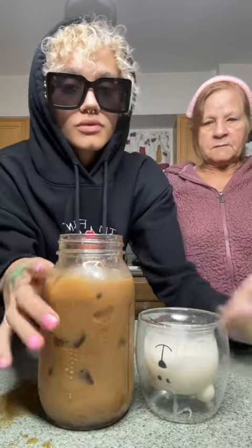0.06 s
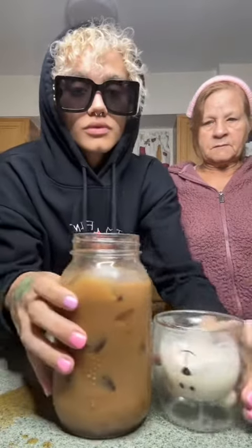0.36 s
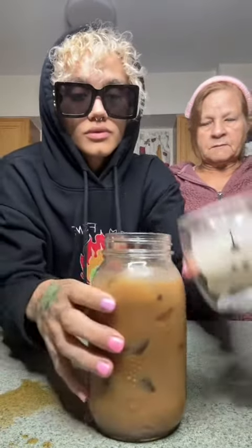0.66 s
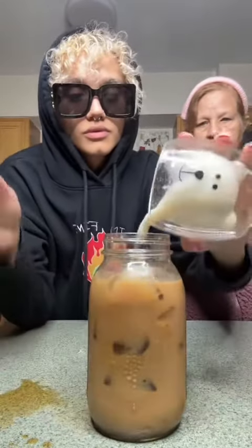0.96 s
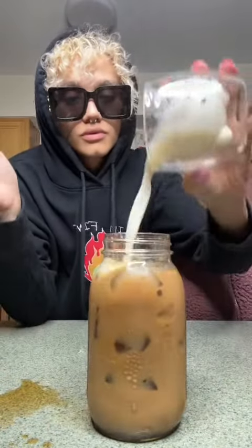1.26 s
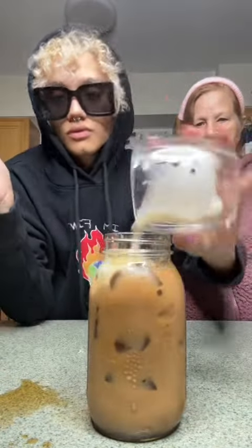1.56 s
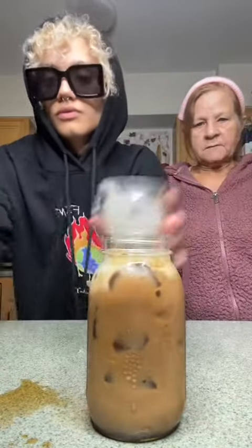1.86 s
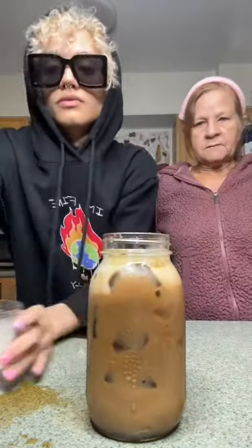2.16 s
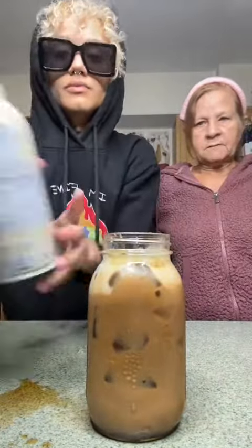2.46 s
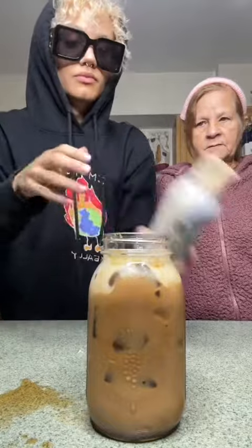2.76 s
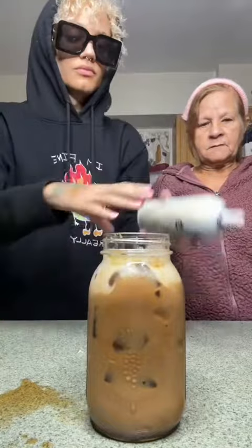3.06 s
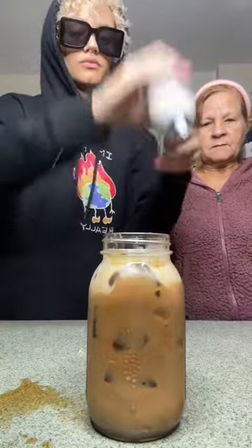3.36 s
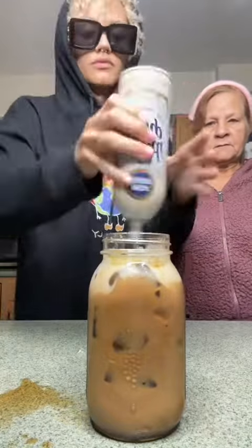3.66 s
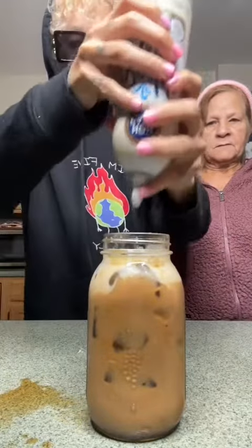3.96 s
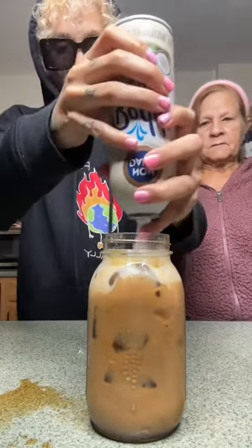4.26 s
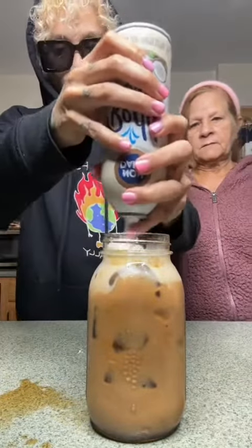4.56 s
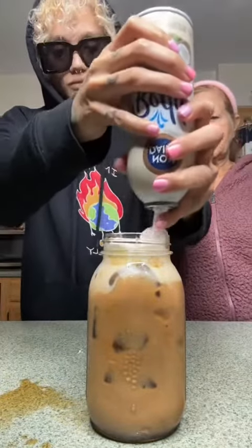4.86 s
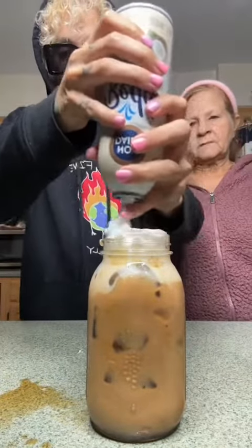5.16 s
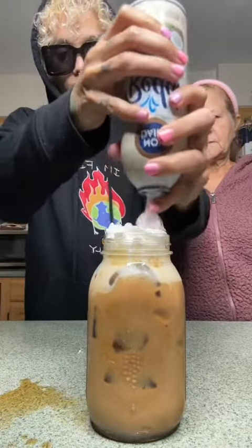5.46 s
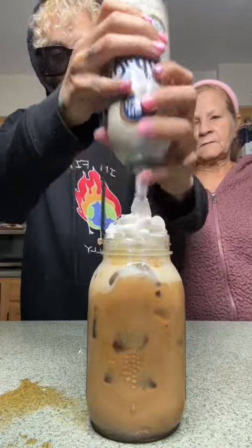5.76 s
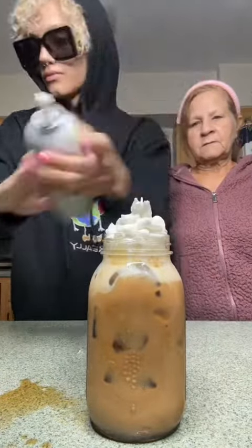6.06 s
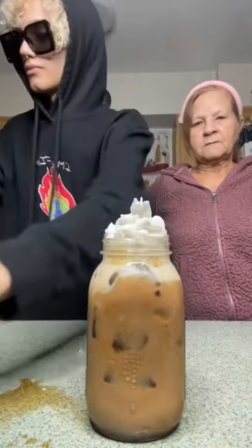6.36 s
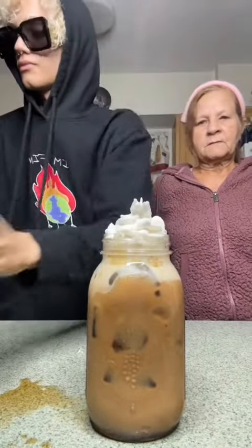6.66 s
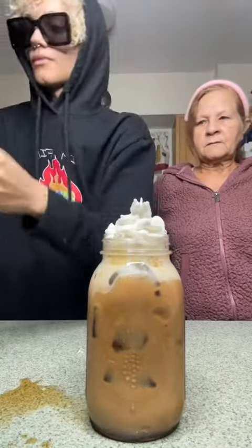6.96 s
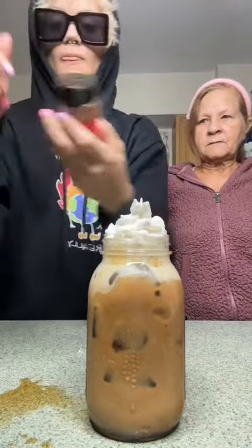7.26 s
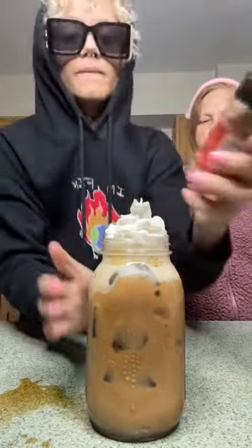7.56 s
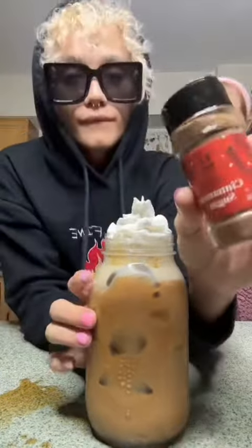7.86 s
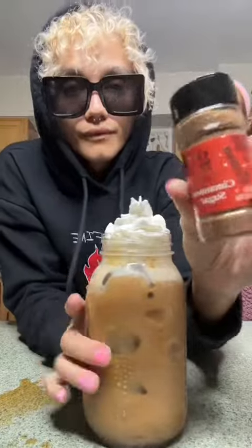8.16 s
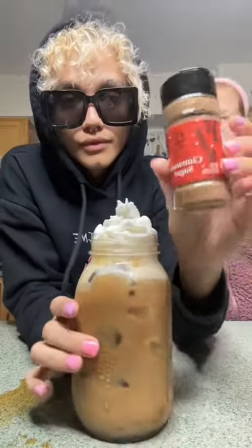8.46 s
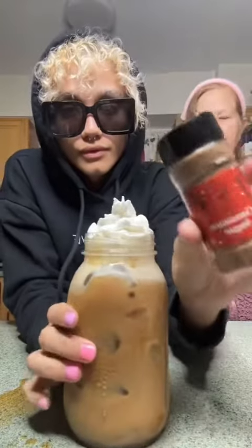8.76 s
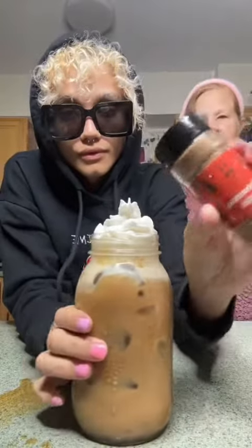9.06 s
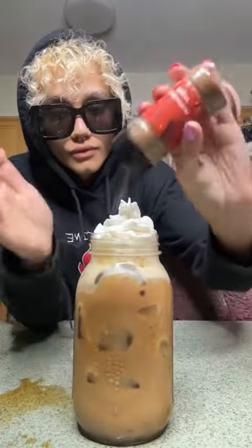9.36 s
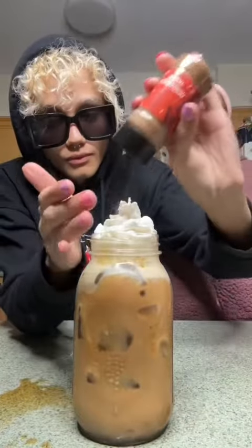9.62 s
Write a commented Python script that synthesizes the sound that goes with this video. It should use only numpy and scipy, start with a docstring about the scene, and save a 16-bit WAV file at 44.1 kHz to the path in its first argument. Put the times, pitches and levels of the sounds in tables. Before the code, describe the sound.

At the start a glass jar knocks and slides on a kitchen counter, and ice clinks inside it until about 1.3 seconds. The jar is set down sharply at 1.5 seconds, and a glass cup knocks twice around 2. A metal can lands loudly at 2.8 seconds and rocks briefly, followed by light fingernail ticks. At 4 seconds the can spits gas, and whipped cream sprays in a growing, sputtering, bubbly hiss that stops at about 5.7. A loud hollow knock on a board comes at 6.3 seconds, then a short jerky scrape. From 7.5 to 9 seconds sleeves rustle and rub, with taps and dull thumps of forearms on the counter, heaviest near 7.8. From 9.3 seconds sugar slides softly in a plastic shaker several times. Everything sounds close, in a small hard room with faint, low ventilation noise.

```python
"""Whipped cream sputters from a can onto iced coffee: gas hisses through slots, bubbles ring the nozzle.
Before it, a glass jar slides on a kitchen counter, ice clinks, a cup knocks, the can lands and rocks.
After it, a hollow board is struck, an object drags in stick-slip jerks, forearms thump down
and sugar slides in a shaker. Knocks travel through the slab as bending waves.
Small hard room, low ventilation noise."""
import sys
import numpy as np
from scipy import signal
from scipy.fft import rfft, irfft
from scipy.io import wavfile

SR = 44100
rng = np.random.default_rng(int(sys.argv[2]) if len(sys.argv) > 2 else 0)


def persist_wave(psi):
    """Save psi, clipped to +-1, as 16-bit WAV."""
    counts = np.round(np.clip(psi, -1, 1) * 32767).astype(np.int16)
    wavfile.write(sys.argv[1], SR, np.atleast_2d(counts).T)


N = 436149
TIME_S = np.arange(N) / SR
HIT_S = TIME_S[:32768]

# Resonances of gas slots, nozzle tube, foam, spits: centre_hz, width_hz, gain_db
SLOT_PEAKS = [(2486, 1080, -2), (3040, 920, -0.5), (3400, 490, -7), (4640, 920, -1.5), (5525, 1440, 2.5),
              (6024, 810, 2), (6960, 1330, 1), (8050, 3540, -2.5), (14440, 3000, -6)]
NOZZLE_PEAKS = [(1487, 310, 14.5), (1800, 530, 2.5)]
FOAM_PEAKS = [(844, 630, 37.5), (470, 180, -26.5), (944, 97, -38)]
SPIT_PEAKS = [(5120, 640, 2.8), (7150, 280, 4.0), (8330, 280, 0.5)]
# Cream clots changing the nozzle level: start_s, gain_db
CREAM_CLOTS = [(4.33, -3), (4.452, 0.5), (5.475, 7)]
# First spits of gas: start_s, level_db
GAS_SPITS = [(4.031, -49.5), (4.067, -18)]
# Hard set-downs: start_s, bass_db, middle_db, treble_db, ring_db, lowest_hz, middle_hz, treble_hz
HARD_KNOCKS = [(0.002, -11.5, -17.5, -16, -6.5, 130, 1900, 4600),
               (1.536, -14.5, -26, -13.5, -4.5, 45, 970, 10800),
               (1.8006, -19, -15.5, -20.5, -6.5, 100, 1290, 3100),
               (2.0273, -20.5, -13, -28, -6.5, 80, 1050, 5600),
               (2.8409, -23, -16, -18.5, 1.5, 186, 1850, 6120),
               (6.3096, -23.5, -29, -23, -5, 210, 1390, 6840),
               (6.3321, -27, -13, -23, -26.5, 200, 1210, 4570)]
# Dull bumps on the counter: start_s, bass_db, lowest_hz, middle_re_bass_db, ring_db
SOFT_BUMPS = [(0.048, -23, 300, -4.5, -22), (0.066, -25, 300, -19, -13), (0.094, -21.5, 283, -26, -28),
              (2.0611, -18, 324, -2, -8), (2.167, -31, 325, -8, -9), (6.3924, -33, 300, 5.5, -27),
              (7.75, -24, 70, -13, -30), (7.912, -29.5, 139, -7, -20), (7.926, -25.5, 70, -21, -30),
              (8.2336, -24, 70.6, -14.5, -15)]
# Heavy landings: start_s, peak_db, pitch_hz, t60_s
LANDINGS = [(1.548, -20, 268, .12), (2.856, -29, 80, .15), (6.342, -20.5, 48.3, 0.049),
            (7.76, -36, 105, .09), (7.831, -8.5, 64, 0.16), (7.931, -19.5, 64, 0.089),
            (8.15, -30, 105, 0.081), (8.242, -27.5, 84, 0.23)]
# Modes of glass jar, glass cup, metal can, hollow board: pitch_hz, level_db, t60_s
JAR_MODES = [(1653, -6, .4), (2700, 1, .16), (2885, -1, .35), (2975, -4, .35), (5663, -15, .6),
             (6767, -5, .3), (8250, 2, .22), (9819, -7, .35)]
CUP_MODES = [(991, -3.5, 0.48), (1650, -9, .5), (3760, 1, 0.13), (5610, -17.5, 1), (5720, 1.5, 0.24)]
CAN_MODES = [(293.4, -4, 0.22), (492, -4.5, .2), (1510, -4.5, 0.052), (2150, -7.5, 0.11),
             (2400, -11.5, 0.38), (3080, 3, 0.08)]
BOARD_MODES = [(261.4, -12, 0.18), (484, -2, 0.065), (796, -26.5, 0.42), (1000, -29, 0.45),
               (1360, -29, .42), (1570, -1, 0.03), (1740, -26.5, .4)]
# Strikes on each: start_s, peak_db
JAR_HITS = [(0.003, -18), (1.537, -16.5), (2.175, -33)]
CUP_HITS = [(1.801, -18), (2.028, -28)]
CAN_HITS = [(2.840, -8)]
BOARD_HITS = [(6.3105, -5), (6.393, -38)]
# Ice against the jar: start_s, level_db, pitch_hz
ICE_CLINKS = [(0.2747, -14.5, 1750), (0.2875, -12, 1740), (0.419, -18.5, 1510), (0.4663, -24, 1520),
              (0.5874, -27, 1580), (0.621, -23.5, 1470), (0.6871, -17.5, 1520), (0.7121, -11, 1580),
              (0.7913, -22.5, 1510), (0.889, -36, 1410), (1.104, -19.5, 1540), (1.1422, -25, 1470),
              (1.168, -23, 1600), (1.261, -34.5, 1620)]
# Light ticks of ice, fingernails and caps: start_s, body_db, snap_db, body_hz
LIGHT_TAPS = [(0.093, -37, -15.5, 1090), (0.245, -26, -1.5, 2250), (0.2735, -18, -7, 1590),
              (1.006, -36.5, -30, 2000), (1.069, -29.5, -28, 1570), (1.1032, -24, -26, 3400),
              (1.1607, -25, -35, 2270), (2.4373, -28, -54, 1010), (2.452, -27.5, -25, 1970),
              (2.5121, -37, -30.5, 2410), (3.318, -37.5, -25.5, 1540), (3.3895, -50, -32.5, 1910),
              (3.6582, -37, -31.5, 1930), (3.7496, -41, -33.5, 3320), (3.9084, -39, -44.5, 4220),
              (5.989, -38, -28.5, 4350), (6.033, -44.5, -33, 4000), (6.05, -40.5, -35, 4030),
              (7.126, -59, -29, 4000), (7.5051, -34, -21, 3340), (7.637, -45, -15.5, 1390),
              (8.314, -33, -16, 1390), (8.7952, -25.5, -13.5, 2470), (9.183, -40, -24.5, 3230),
              (9.298, -37.5, -28.5, 3420), (9.357, -46, -18.5, 3000)]
# Dragged object breaking loose: start_s, scrape_db, drone_db
DRAG_JERKS = [(6.591, -40.5, -37), (6.652, -27, -26), (6.701, -27, -22.5), (6.731, -22, -31.5),
              (6.781, -35, -34.5), (6.839, -46, -39), (6.868, -40, -39)]
# Its scrape and hollow-body resonances: centre_hz, width_hz, gain_db
SCRAPE_PEAKS = [(725, 260, -1.5), (1410, 460, -2.5), (2070, 460, 2.5), (3180, 1300, -2), (6440, 2900, -0.5)]
HOLLOW_PEAKS = [(370, 59, 3), (470, 67, -3)]
# Sugar slides: start_s, length_s, level_db
SUGAR_SLIDES = [(9.339, 0.034, -26), (9.386, 0.054, -38.5), (9.455, 0.11, -36), (9.603, 0.08, -34),
                (9.766, 0.15, -34)]
# Sleeves, hands and jar over the counter: start_s, length_s, rub_db, rustle_db, rumble_db
COUNTER_STROKES = [(0.0, 0.45, -37, -40, -43), (0.465, 0.077, -37.5, -39.5, -47),
                   (0.613, 0.16, -64, -58, -44), (0.781, .66, -53.5, -53.5, -53),
                   (1.54, 0.4, -50.5, -55, -46), (2.105, 0.17, -45, -49, -52),
                   (2.43, 0.18, -60, -58, -52.5), (6.99, 0.17, -70, -50.5, -68),
                   (7.353, 0.34, -67, -52, -67), (7.588, 0.089, -40, -41.5, -41),
                   (7.715, 0.22, -40.5, -47, -36.5), (8.07, 0.18, -51, -50.5, -44.5),
                   (8.254, 0.16, -37.5, -46.5, -45), (8.592, 0.16, -35.5, -43.5, -41.5),
                   (8.844, 0.14, -38, -44, -48), (9.04, 0.2, -61, -49, -49.5), (9.28, 0.5, -53.5, -52, -51)]
# Spectra of sugar, rubbing, rustle, ventilation, microphone response: frequency_hz, gain_db
SUGAR_SPECTRUM = [(1500, -14), (4000, -3.5), (6200, 3), (9000, 3), (15000, 3)]
RUB_SPECTRUM = [(40, -27.5), (160, -1.5), (350, 6), (800, -2.5), (1500, -0.5), (2500, -5), (5000, -11),
                (12000, -19.5)]
RUSTLE_SPECTRUM = [(1500, -29), (3500, -7.5), (5500, 4), (7500, 2.5), (15000, -1.5)]
VENT_SPECTRUM = [(25, -8.5), (60, -0.5), (100, -10.5), (140, 4.5), (250, -2.5), (450, -6.5), (800, -15.5),
                 (2000, -21), (6000, -20), (15000, -25)]
MIC_RESPONSE = [(20, -18.5), (50, 4.5), (4800, -1.5), (6100, 0), (6500, 0), (8500, -5.5), (8850, -14.5),
                (11000, -17.5), (12900, -7.5), (13300, -4), (16000, -1)]
# Room decay: frequency_hz, t60_s
ROOM_DECAY = [(100, 0.2), (400, 0.51), (1200, 0.36), (4000, 0.44), (8000, 0.092), (16000, 0.47)]


def cream(open_s=4.069, held_s=1.644, spurt_hz=95, spurt_db=2.5, sag_db_per_s=8, clot_s=.025):
    """Gas and foam leave in uneven spurts; bubbles ring the nozzle and splutter on the drink."""
    valve = swell(open_s, held_s, attack_s=.027, release_s=.0061)
    age_s = np.clip(TIME_S - open_s, 0, held_s)

    def build(full_db, shortfall_db, build_s):
        """Gain rising as the nozzle clears."""
        return valve * undb(full_db - shortfall_db * np.exp(-age_s / build_s))

    clots_db = sum(db * swell(s, clot_s, clot_s / 2, clot_s / 2) for s, db in CREAM_CLOTS)
    tube_gain = build(-20.5, 9.4, .35) * undb(clots_db - sag_db_per_s * age_s)
    filled = np.clip((age_s - .1) / .012, 0, 1)  # cream arrives after the gas
    flow = undb(walk(170))
    spurt_phase = 2 * np.pi * np.cumsum(spurt_hz * (1 + .293 * walk(40))) / SR
    spurts = undb(spurt_db * np.sin(spurt_phase))
    pops = undb(-14) * grains(60, 2)
    gas = grains(11000, 1.9) * flow + pops
    hiss = build(-17.5, 18.7, .31) * slot_hiss(gas, age_s)
    bubbles = grains(3500, 3) * spurts + undb(9) * pops
    tube = tube_gain * unit(band(resonate(bubbles, NOZZLE_PEAKS), 1850, 5000))
    splutter = resonate(grains(2500, 1.4) * flow, FOAM_PEAKS)
    foam = build(-32, 12, .32) * unit(band(splutter, 260, 1200))
    return undb(-7 * (1 - filled)) * (hiss + tube + foam)


def slot_hiss(gas, age_s, wander_db=1.27, tilt_db_per_octave_s=1.6, pivot_hz=7000, even_s=.85):
    """Slots clog and clear independently; low resonances fade as the mound grows."""
    out = 0
    for peak in SLOT_PEAKS:
        tone = resonate(resonate(gas, [peak]), [peak])
        tilt_db = tilt_db_per_octave_s * np.log2(pivot_hz / peak[0]) * (age_s - even_s)
        out = out + tone * undb(wander_db * walk(9) - tilt_db)
    return unit(band(out, 1500, 19000, order=3))


def spits():
    """The opening valve spits gas."""
    gain = sum(undb(db) * swell(s, length_s=.019, attack_s=.013, release_s=.02) for s, db in GAS_SPITS)
    return gain * unit(band(resonate(grains(9000, 1.6), SPIT_PEAKS), 4300, 12000))


def knocks():
    """Hard knocks and dull bumps on the counter."""
    out = np.zeros(N)
    for s, bass_db, middle_db, treble_db, ring_db, *pitches_hz in HARD_KNOCKS:
        add(out, s, blow((bass_db, middle_db, treble_db), ring_db, *pitches_hz))
    for s, db, lowest_hz, tilt_db, ring_db in SOFT_BUMPS:
        levels_db = db, db + tilt_db, db + tilt_db - 15
        add(out, s, blow(levels_db, ring_db, lowest_hz, middle_hz=820, bass_top_hz=lowest_hz + 330))
    return out


def blow(levels_db, ring_db, lowest_hz, middle_hz, treble_hz=5600, bass_top_hz=540,
         echo_s=.0135, echo_db=-9, scatter_db=3, scatter_cycles=7, build_s=.0056):
    """A blow scatters off near slab edges, echoes from the ceiling and leaves a dense ring."""
    push = signal.unit_impulse(len(HIT_S))
    echo = undb(echo_db) * np.roll(push, int(echo_s * SR))
    # low_hz, high_hz, tail_db, t60_s
    bands = [(lowest_hz, bass_top_hz, 4, .19),
             (middle_hz / 1.94, middle_hz * 1.43, 0, .16),
             (treble_hz / 1.88, treble_hz * 1.88, 0, .13)]
    out = 0
    for db, (low_hz, high_hz, tail_db, t60_s) in zip(levels_db, bands):
        contact = push + undb(scatter_db) * burst(scatter_cycles / high_hz + .0061)
        direct = slab(band(contact, low_hz, high_hz))
        direct *= np.sqrt(SR / 100) / np.linalg.norm(direct)  # energy of 10 ms at rms 1
        tail = undb(tail_db) * burst(t60_s) * (1 - np.exp(-HIT_S / build_s))
        after = signal.fftconvolve(direct, echo + tail)[:len(HIT_S)]
        out = out + undb(db) * (direct + undb(ring_db) * after)
    return out


def slab(x, lag_s=.01067, corner_hz=105, steepness=1.35):
    """Bending waves disperse: lows arrive after the crack."""
    hz = np.fft.rfftfreq(len(x), 1 / SR)
    delay_s = 2 * lag_s / (1 + (hz / corner_hz) ** steepness)
    return irfft(rfft(x) * np.exp(-2j * np.pi * np.cumsum(delay_s) * hz[1]))


def thumps(rise_s=.0014, upper_ratio=1.9, upper_db=-7):
    """Soft weight swings the counter's lowest modes."""
    out = np.zeros(N)
    onset = 1 - np.exp(-HIT_S / rise_s)
    for s, db, hz, t60_s in LANDINGS:
        swing = ring([(hz, 0, t60_s), (hz * upper_ratio, upper_db, t60_s / 2)])
        add(out, s, undb(db) * crest(swing * onset))
    return out


def vessel(hits, modes, flutter_depth, flutter_hz):
    """A struck hollow body rings; contents and loose parts roughen it."""
    out = np.zeros(N)
    for s, db in hits:
        add(out, s, undb(db) * crest(ring(modes, flutter_depth, flutter_hz)))
    return out


def rocking(start_s=2.9118, gap_s=.04, gap_ratio=.775):
    """The can tips from edge to edge, ever faster, softer and duller."""
    out = np.zeros(N)
    for k in range(5):
        s = start_s + gap_s * (1 - gap_ratio ** k) / (1 - gap_ratio)
        add(out, s, tick(body_db=-18 - 2.2 * k, snap_db=-17.5 - 5 * k, body_hz=1870))
    return out


def ice(clink_t60_s=.034, liquid_db=-21):
    """Cubes bump the glass; the drink damps each clink and leaves a soft wobbling ring."""
    out = np.zeros(N)
    liquid = [(1303, liquid_db, .25), (1480, liquid_db, .12)]
    for s, db, hz in ICE_CLINKS:
        glass = [(hz, 0, clink_t60_s), (hz * 1.09, -6, clink_t60_s)]
        clink = crest(ring(glass + liquid, flutter_depth=.72))
        add(out, s, undb(db) * (clink + tick(body_db=-8, snap_db=-13, body_hz=hz)))
    return out


def taps():
    """Light ticks of ice, fingernails and caps against glass, can and shaker."""
    out = np.zeros(N)
    for s, body_db, snap_db, body_hz in LIGHT_TAPS:
        add(out, s, tick(body_db, snap_db, body_hz))
    return out


def tick(body_db, snap_db, body_hz, skid_db=-16):
    """Light hard contact: hollow body, bright snap, brief skid."""
    hollow = crest(band(burst(t60_s=.031), body_hz * .67, body_hz * 1.3))
    contact = crest(burst(t60_s=.028)) + undb(skid_db) * crest(burst(t60_s=.29))
    bright = crest(resonate(contact, [(5730, 560, -5.5), (7300, 1500, -5.5), (14200, 19000, -16.5)]))
    return undb(body_db) * hollow + undb(snap_db) * bright


def drag(scrape_db=-25, drone_db=-41, judder_db=-.5, rumble_db=-18, slip_db=4):
    """Stick-slip catches scrape, ring a hollow body in jerks and shake the counter."""
    pull = swell(start_s=6.64, length_s=.19, attack_s=.13, release_s=.048)
    gains = np.outer(undb([scrape_db, drone_db]), pull)
    for s, *levels_db in DRAG_JERKS:
        gains += np.outer(undb(levels_db), swell(s, length_s=.019, attack_s=.0043, release_s=.013))
    scrape_gain, drone_gain = gains
    catches = grains(3400, .53) * undb(judder_db * walk(130))
    slips = catches * undb(slip_db * walk(60))
    drone = unit(band(resonate(slips, HOLLOW_PEAKS), 160, 1070))
    scrape = unit(resonate(catches, SCRAPE_PEAKS))
    rumble = undb(rumble_db) * unit(band(catches, 36, 110))
    return scrape_gain * (scrape + rumble) + drone_gain * drone


def jolts():
    """Each jerk of the drag knocks on the counter."""
    out = np.zeros(N)
    for s, scrape_db, drone_db in DRAG_JERKS:
        levels_db = drone_db - 2, scrape_db - 2, scrape_db - 9
        add(out, s, blow(levels_db, ring_db=-6, lowest_hz=320, middle_hz=1100))
    return out


def shaker(clump_db=4):
    """Sugar slides in clumps against the plastic wall."""
    gain = sum(undb(db) * swell(s, length_s, attack_s=.015, release_s=.014)
               for s, length_s, db in SUGAR_SLIDES)
    return gain * unit(colour(grains(3100, .88), SUGAR_SPECTRUM)) * undb(clump_db * walk(100))


def handling():
    """Cloth and glass catch and slip on the counter, which rumbles."""
    rub_gain, rustle_gain, rumble_gain = sum(
        np.outer(undb(levels_db), swell(s, length_s, attack_s=.069, release_s=.057))
        for s, length_s, *levels_db in COUNTER_STROKES)
    rub = unit(colour(grains(5000, 1.6), RUB_SPECTRUM)) * undb(1.3 * walk(76))
    rustle = unit(colour(grains(4700, .7), RUSTLE_SPECTRUM)) * undb(4 * walk(90))
    rumble = unit(band(grains(900, .69), 38, 240))
    return rub_gain * rub + rustle_gain * rustle + rumble_gain * rumble


def room(x, wet_db=-12, first_s=.011):
    """Cupboards and ceiling return a diffuse tail."""
    edges_hz = 60 * 2. ** np.arange(10)
    tail = 0
    for low_hz, high_hz in zip(edges_hz, edges_hz[1:]):
        t60_s = along(ROOM_DECAY, np.sqrt(low_hz * high_hz))
        tail = tail + band(rng.standard_normal(len(HIT_S)), low_hz, high_hz) * fade(t60_s)
    tail = np.r_[np.zeros(int(first_s * SR)), tail / np.linalg.norm(tail)]
    return x + undb(wet_db) * signal.fftconvolve(x, tail)[:N]


def ventilation(level_db=-53.5, drift_db=.37):
    """Steady low air noise under a faint hiss."""
    air = unit(colour(rng.standard_normal(N), VENT_SPECTRUM))
    return air * undb(level_db + drift_db * walk(1.9))


def undb(db):
    """Decibels to gain."""
    return 10 ** (np.asarray(db) / 20)


def unit(x):
    """Scale to rms 1."""
    return x / np.sqrt(np.mean(x ** 2))


def crest(x):
    """Scale to peak 1."""
    return x / np.abs(x).max()


def add(track, start_s, sound):
    """Mix in place."""
    i = max(int(start_s * SR), 0)
    track[i:i + len(sound)] += sound[:N - i]


def along(points, hz):
    """Interpolate on a log-frequency axis."""
    points_hz, values = np.transpose(points)
    return np.interp(np.log(hz + 1), np.log(points_hz), values)


def colour(x, spectrum, size=8192):
    """Minimum-phase filter."""
    gain = undb(along(spectrum, np.fft.rfftfreq(size, 1 / SR)))
    cepstrum = irfft(np.log(gain))
    cepstrum[1:size // 2] *= 2
    cepstrum[size // 2 + 1:] = 0
    return signal.fftconvolve(x, irfft(np.exp(rfft(cepstrum))))[:len(x)]


def band(x, low_hz, high_hz, order=2):
    """Band-pass filter."""
    sos = signal.butter(order, [low_hz, min(high_hz, SR / 2 - 1)], "band", fs=SR, output="sos")
    return signal.sosfilt(sos, x + 1e-18)


def resonate(x, peaks):
    """Parallel resonances of alternating sign."""
    return sum((-1) ** k * undb(db) * signal.lfilter(*signal.iirpeak(hz, hz / width_hz, fs=SR), x + 1e-18)
               for k, (hz, width_hz, db) in enumerate(peaks))


def ring(modes, flutter_depth=0., flutter_hz=150):
    """Decaying modes with random amplitude and phase flutter."""
    out, n = 0, len(HIT_S)
    for hz, db, t60_s in modes:
        a, b = (flutter_depth * np.interp(HIT_S * flutter_hz, np.arange(n), rng.standard_normal(n))
                for _ in range(2))
        phase = 2 * np.pi * hz * HIT_S
        out = out + undb(db) * fade(t60_s) * ((1 + a) * np.sin(phase) + b * np.cos(phase))
    return out


def swell(start_s, length_s, attack_s, release_s):
    """Rise, hold until length_s, decay."""
    age_s = TIME_S - start_s
    return np.clip(age_s / attack_s, 0, 1) * np.exp(-np.clip((age_s - length_s) / release_s, 0, 20))


def fade(t60_s):
    """Exponential decay."""
    return np.exp(-np.log(1000) * HIT_S / t60_s)


def burst(t60_s):
    """Decaying noise of unit energy."""
    x = rng.standard_normal(len(HIT_S)) * fade(t60_s)
    return x / np.linalg.norm(x)


def walk(rate_hz):
    """Smooth random curve, spread near 1."""
    return np.interp(TIME_S * rate_hz, np.arange(N // 10), rng.standard_normal(N // 10))


def grains(rate_hz, spread_db):
    """Random tiny impacts of uneven size."""
    impacts = (rng.random(N) < rate_hz / SR) * rng.standard_normal(N)
    return unit(impacts * undb(spread_db * np.clip(rng.standard_normal(N), -2, 2)))


def scene():
    """Close sources in the room, over ventilation; mono."""
    sources = knocks() + thumps()
    sources += vessel(JAR_HITS, JAR_MODES, flutter_depth=2.2, flutter_hz=170)
    sources += vessel(CUP_HITS, CUP_MODES, flutter_depth=1.4, flutter_hz=220)
    sources += vessel(CAN_HITS, CAN_MODES, flutter_depth=1.2, flutter_hz=320)
    sources += vessel(BOARD_HITS, BOARD_MODES, flutter_depth=1.3, flutter_hz=300)
    sources += rocking() + ice() + taps() + handling()
    sources += cream() + spits() + drag() + jolts() + shaker()
    return (room(sources) + ventilation())[None]


def record(dry, top_hz=15750):
    """Microphone colour, full-scale clip, low-pass."""
    clipped = np.clip(colour(dry[0], MIC_RESPONSE), -1, 1)
    return signal.sosfilt(signal.ellip(8, .2, 70, top_hz, fs=SR, output="sos"), clipped)[None]


dry = scene()
out = record(dry)
persist_wave(out)
```